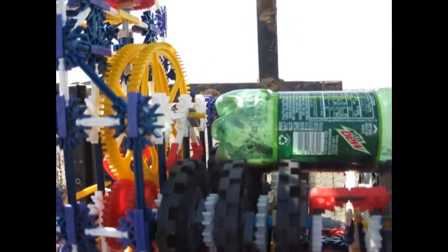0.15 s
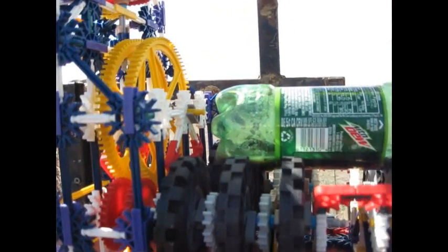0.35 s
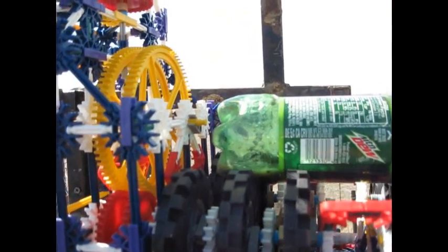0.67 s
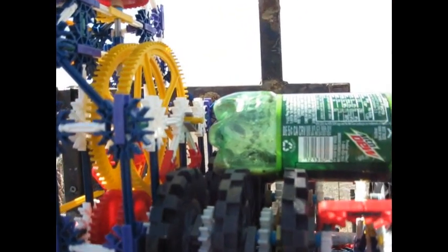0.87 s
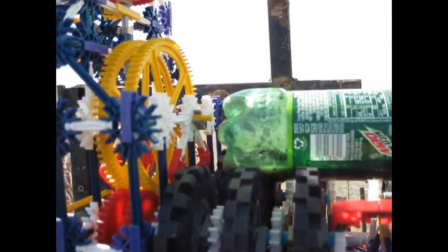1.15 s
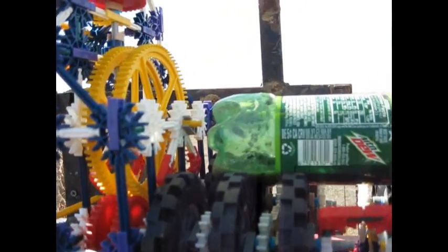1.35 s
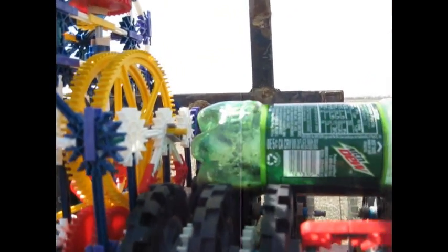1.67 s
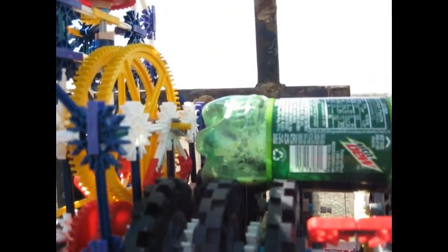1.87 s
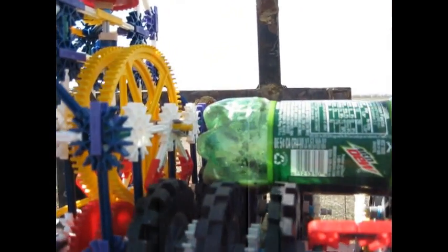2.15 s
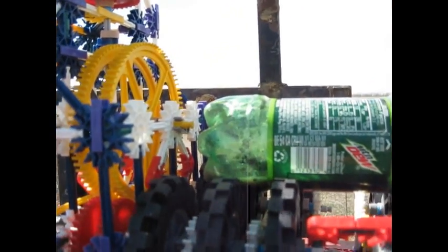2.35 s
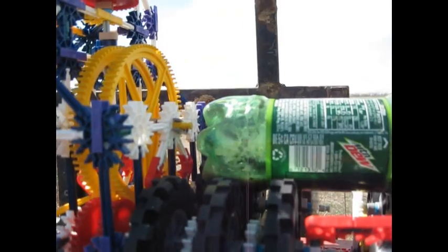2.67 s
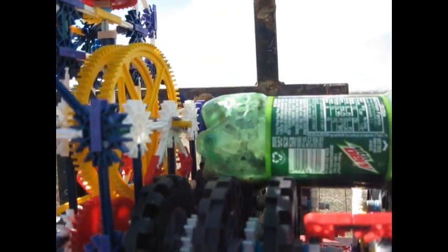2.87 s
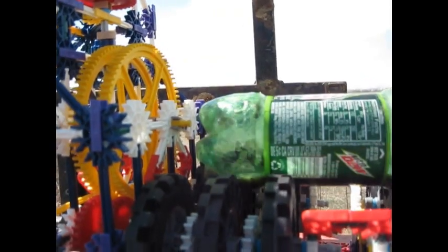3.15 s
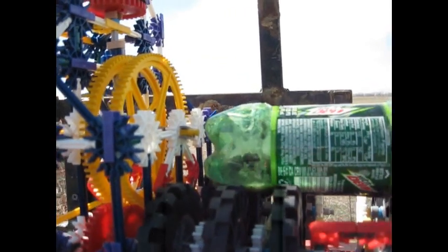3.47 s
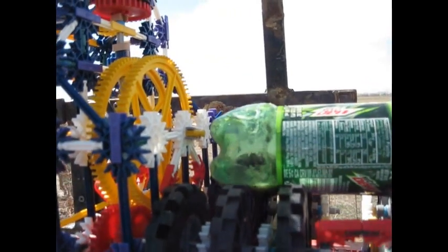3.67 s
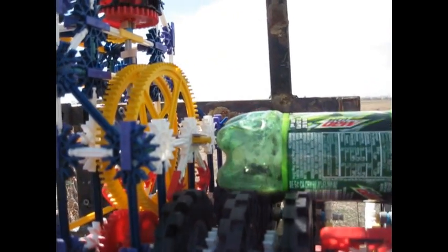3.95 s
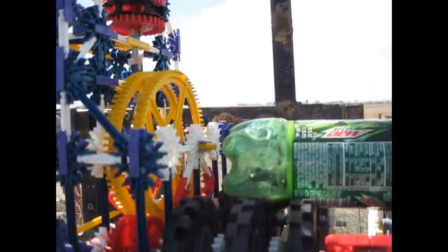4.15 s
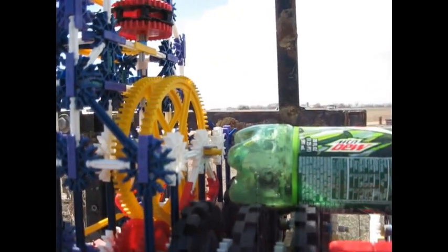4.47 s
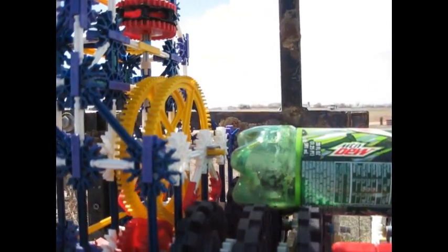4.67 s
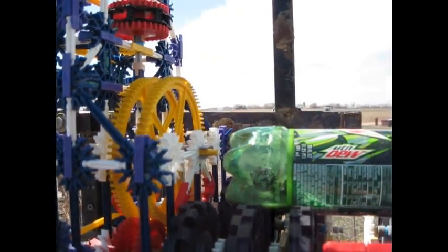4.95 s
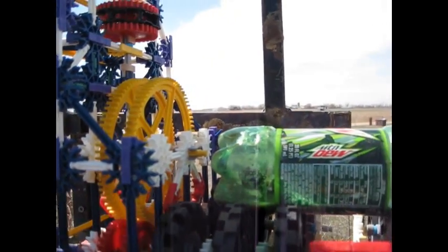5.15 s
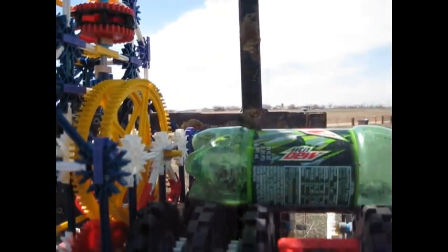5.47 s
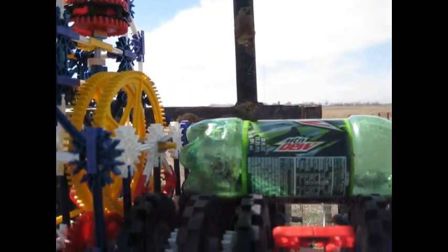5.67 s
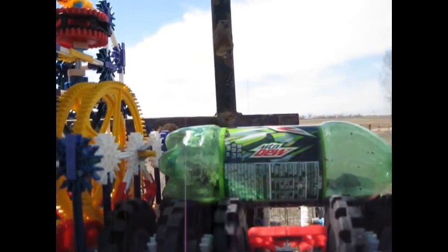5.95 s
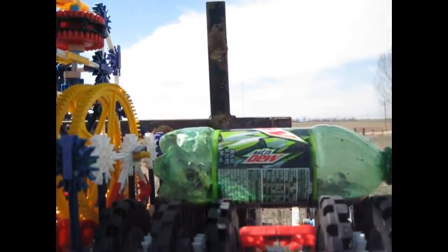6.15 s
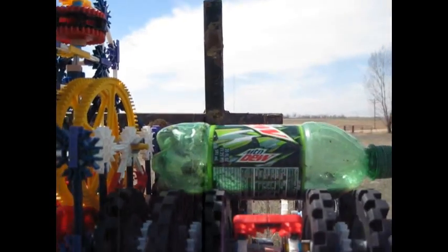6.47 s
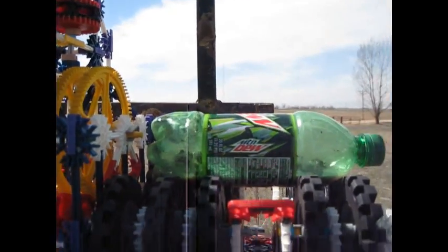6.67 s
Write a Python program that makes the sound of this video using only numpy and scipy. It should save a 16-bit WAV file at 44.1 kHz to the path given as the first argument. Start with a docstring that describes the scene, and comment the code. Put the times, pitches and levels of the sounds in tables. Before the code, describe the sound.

Throughout, a toy motor gives a low hum near 90 Hz, sagging slightly in pitch, with buzzing overtones, a frame rumble and fine plastic gear rustle. It is close, dry and outdoors, with a narrow small-camera sound. A soft wind bump comes at 0.1 s. At 0.6-0.8 s stones crack and thud against the hollow bottle with a spill of grit as the background dips briefly; a smaller knock follows at 1.1. From 1.2 to 2.1 the hum swells, with faint high axle chirps and scraping and small gusts. Knocks land at 2.2, then gravel builds to a loud, very short clack with a plink at 3.24. Rattling slides and clicks follow at 3.7-4.0, 4.64 and 5.1-5.2, with light scraping around 4.5. After a quieter stretch, gravel surges at 6.3-6.6 with rapid clicks, one bright tick at 6.47 and hollow plinks, ending around 6.8.

```python
"""A toy-motor rock tumbler close by in the open air: a plastic bottle turns on wheels, driven through plastic gears.
Stones drop against the bottle wall as noise cracks with a hollow modal thud, and gravel slides down it in swells
of tiny impacts and ringing pebbles. The motor hums as a slowing stack of sine orders, the gears rustle as coloured
noise, an axle chirps, hollow plinks ring inside the bottle and light wind buffets the microphone.
The microphone is that of a small camera with a narrow band; one very short bright tick is heard near the end."""
import sys
import numpy as np
from scipy import signal
from scipy.fft import rfft, irfft, next_fast_len
from scipy.io import wavfile
from scipy.ndimage import map_coordinates

SR = 44100
rng = np.random.default_rng(int(sys.argv[2]) if len(sys.argv) > 2 else 0)


def put_to_file(sound):
    """Save the sound as 16-bit audio at rate SR, in the file named by the first command-line argument."""
    columns = np.atleast_2d(sound).T  # one column per channel
    safe = np.clip(columns, -1, 1)
    whole_steps = np.round(safe * 32767)
    wavfile.write(sys.argv[1], SR, whole_steps.astype(np.int16))


N = 300497  # length in samples


def amp(db):
    """Decibels to gain."""
    return 10 ** (np.asarray(db) / 20)


def unit(x):
    """Scaled to rms 1."""
    return x / np.sqrt(np.mean(x ** 2) + 1e-20)


def curve(rows):
    """A (seconds, value) table drawn as straight lines, one value per sample."""
    seconds, values = np.transpose(rows)
    return np.interp(np.arange(N) / SR, seconds, values)


def wobble(rate):
    """A smooth random curve, rate knots a second."""
    knots = rng.standard_normal(int(N * rate / SR) + 4)
    return map_coordinates(knots, [np.arange(N) * rate / SR])


def filtered(x, response):
    """x times a complex response of frequency."""
    size = next_fast_len(len(x) + 8192)  # spare room keeps tails from wrapping round to the start
    hz = np.fft.rfftfreq(size, 1 / SR)
    return irfft(rfft(x, size) * response(hz), size)[:len(x)]


def colour(points, hz):
    """Causal, minimum-phase response through (Hz, dB) points, with a weak shelf in the high treble."""
    point_hz, point_db = np.transpose(points)
    level_db = np.interp(np.log(hz + 1), np.log(point_hz), point_db)
    shelf = 0.15 + 0.85 / (1 + (hz / 5900) ** 30)
    cepstrum = irfft(np.log(amp(level_db) * shelf))
    half = len(cepstrum) // 2
    # folding the cepstrum onto positive times makes the response causal
    fold = np.r_[1, np.full(half - 1, 2), 1, np.zeros(half - 1)]
    return np.exp(rfft(cepstrum * fold))


def resonance(hz, centre, width):
    """One causal band-pass mode."""
    return 1j * hz * width / (centre ** 2 - hz ** 2 + 1j * hz * width)


def noise(points):
    """Coloured noise of rms 1."""
    return unit(filtered(rng.standard_normal(N), lambda hz: colour(points, hz)))


def contacts(rate, spread_db):
    """Random tiny impacts of uneven size, about rate a second, rms 1."""
    hits = rng.random(N) < rate / SR
    signs = rng.choice([-1, 1], N)
    sizes = amp(spread_db * np.clip(rng.standard_normal(N), -2, 2))
    return unit(hits * signs * sizes)


def add(out, s, x):
    """Mix x into out at s seconds."""
    start = max(round(s * SR), 0)
    out[start:start + len(x)] += x[:max(N - start, 0)]


SWELL_DB = 20  # how far below full level a swell lies at its rise or fall time
SWELL_BEND = 1.355  # above 1, a swell is round on top and steep at its feet


def swell(s, rise, hold, fall, db):
    """A gain that grows to db at s seconds, holds and dies away; rise and fall are the times for SWELL_DB."""
    t = np.arange(N) / SR - s
    before = np.maximum(-t, 0) / max(rise, 1 / SR)
    after = np.maximum(t - hold, 0) / max(fall, 1 / SR)
    return amp(db - SWELL_DB * np.minimum(before + after, 10) ** SWELL_BEND)


# A brief dip in the low background. The row: start in seconds, rise in seconds, hold in seconds, fall in seconds,
# lost share of the gain in dB. A rise or fall below zero is a step of about one sample.
BACKGROUND_DIP = (.84, -0.67, 0.5, -0.26, -3.5)


def dip():
    """Gain of the low background, which drops for a moment."""
    return 1 - np.minimum(swell(*BACKGROUND_DIP), 1)


# Motor speed. Each row: time in seconds, rotor turns per second in Hz.
MOTOR_SPEED = [(0, 92.2), (.15, 94.6), (.9, 93.5), (1.4, 92.1), (2, 91.07), (2.7, 89.87), (3.3, 88.99),
               (3.9, 87.9), (4.4, 85.86), (4.9, 86), (5.4, 86.4), (6.1, 85.2), (6.5, 84.3), (6.81, 84.8)]
# The frame's shaking, once a rotor turn. Each row: time in seconds, level in dB before a slight flutter.
SHAKING = [(0.0, -39), (0.13, -38), (0.19, -46), (0.87, -51.5), (1.02, -40), (1.48, -30), (1.91, -31),
           (2.27, -38), (2.94, -37), (3.15, -41), (3.39, -34), (4.04, -37.5), (4.21, -43), (4.3, -37),
           (4.51, -41), (4.7, -34.5), (5.22, -36.5), (5.56, -33.5), (5.65, -40), (6.45, -37.5), (6.56, -43),
           (6.81, -35.5)]
# Overtones of the shaking. Each row: order in multiples of the rotor rate, level in dB at average shaking.
SHAKING_OVERTONES = [(2, -54.5), (3, -58), (4, -62.5), (5, -73)]
OVERTONE_FOLLOW = 0.27  # dB of overtone per dB of shaking
# A loose joint buzzes for a while on one order. Each row: start at full level in seconds, hold in seconds,
# order in multiples of the rotor rate, level in dB before flutter.
JOINT_BUZZES = [(0.132, 0.25, 4, -47), (.18, 0.085, 2, -51), (.18, 0.19, 3, -51.5), (1.273, .26, 2, -41.5),
                (1.38, 1.2, 3, -51), (1.925, 0.28, 4, -52.5), (2.18, .23, 2, -45.5), (2.5, 0.23, 4, -58),
                (2.636, 0.13, 2, -50.5), (3, 0.43, 2, -48.5), (3.115, 0.37, 3, -50.5),
                (3.78, 0.073, 2, -53.5), (4.717, .2, 3, -48.5), (4.725, 0.19, 4, -55),
                (5.159, 0.35, 3, -53), (6.068, .48, 3, -51), (6.45, 0.11, 2, -51.5)]
BUZZ_RISE_S, BUZZ_FALL_S = 0.14, 0.13
# Spectrum of the frame's rumble. Each row: frequency in Hz, relative density in dB per Hz.
FRAME_SPECTRUM = [(60, -18.5), (130, -4), (250, 1.5), (400, -8.5), (600, -8), (1000, -31)]
RUMBLE_DB, RUMBLE_FOLLOW = -52.5, 0.51  # level before the dip; dB of rumble per dB of the third order


def motor():
    """The unbalanced rotor shakes the frame once a turn; loose joints buzz on its overtones, and the frame rumbles."""
    phase = 2 * np.pi * np.cumsum(curve(MOTOR_SPEED)) / SR
    shake_db = curve(SHAKING)
    gains = {1: amp(shake_db)}
    for order, db in SHAKING_OVERTONES:
        follow_db = OVERTONE_FOLLOW * (shake_db - shake_db.mean())
        gains[round(order)] = dip() * amp(db + follow_db)
    for s, hold, order, db in JOINT_BUZZES:
        buzz = swell(s, BUZZ_RISE_S, hold, BUZZ_FALL_S, db)
        gains[round(order)] = gains[round(order)] + buzz
    hum = 0  # the orders start in step, so that each turn is one lopsided beat
    for order, gain in gains.items():
        # the first order keeps its phase; higher orders waver and flutter more
        waver = 0.073 * (order - 1) ** 2 * wobble(24)  # radians
        flutter_db = (0.54 + 0.7 * (order - 1)) * wobble(22)
        tone = np.sqrt(2) * np.sin(order * phase + waver)
        hum = hum + gain * amp(flutter_db) * tone
    rumble = unit(gains[3] ** RUMBLE_FOLLOW) * noise(FRAME_SPECTRUM)
    return hum + dip() * amp(RUMBLE_DB) * rumble


# Gear rustle. Each row: time in seconds, level in dB before it wavers and its two parts are mixed.
RUSTLE_LEVEL = [(0, -46), (.55, -47), (.88, -50.5), (1.05, -48.5), (1.25, -47), (1.6, -45.5), (2.3, -47),
                (3.5, -47), (4.3, -46), (5.4, -46.5), (6, -48), (6.81, -45)]
# Spectrum of the rustle. Each row: frequency in Hz, relative density in dB per Hz.
RUSTLE_SPECTRUM = [(100, 8.5), (250, 9), (450, 8.5), (750, 0.5), (1100, 2.5), (1700, 0), (2600, -1),
                   (2900, 0.5), (3700, -1), (5400, -1.5)]
# Spectrum of the axle's scrape. Each row: frequency in Hz, relative density in dB per Hz.
SCRAPE_SPECTRUM = [(2500, -40.5), (4100, -4), (4550, 1), (4900, 0), (5400, -5.5)]
# The axle binds and rubs harder. Each row: start at full level in seconds, rise in seconds, hold in seconds,
# fall in seconds, level in dB before the scrape wavers.
HARD_RUBS = [(1.45, 0.35, .05, 0.59, -51), (4.326, 0.31, 0.35, 0.44, -52.5)]
RUB_DB = -68  # the dry axle's steady rubbing


def gears():
    """Plastic teeth and tyres rustle finely; a dry axle adds a high scrape that breaks into faint twitter."""
    teeth = unit(filtered(contacts(rate=1500, spread_db=1.5), lambda hz: colour(RUSTLE_SPECTRUM, hz)))
    rustle_gain = amp(curve(RUSTLE_LEVEL) + 0.43 * wobble(13))
    rustle = rustle_gain * (amp(-6.5) * noise(RUSTLE_SPECTRUM) + amp(-3) * teeth)
    squeak_hz = 4850 + 220 * wobble(50)
    squeak = np.sin(2 * np.pi * np.cumsum(squeak_hz) / SR)
    twitter = unit(amp(7 * np.clip(wobble(45), -2, 1.3)) * squeak)
    scrape = amp(1.7 * wobble(36)) * noise(SCRAPE_SPECTRUM)
    rubbing = amp(RUB_DB) + sum(swell(*row) for row in HARD_RUBS)
    return rustle + rubbing * (scrape + amp(-7.5) * twitter)


# Gusts on the microphone. Each row: start at full level in seconds, hold in seconds, level in dB before the lumps.
WIND_GUSTS = [(0.138, 0.11, -40), (1.31, 0.028, -46), (1.443, 0.02, -43.5), (1.796, 0.17, -52.5),
              (4.34, .07, -46)]
GUST_RISE_S, GUST_FALL_S = 0.029, 0.059
# Spectrum of the buffeting. Each row: frequency in Hz, relative density in dB per Hz.
BUFFET_SPECTRUM = [(10, -1.5), (30, -5.5), (55, -0.5), (90, -1.5), (130, -3), (220, -14), (500, -28),
                   (1500, -68)]
WIND_DB = -49  # the breeze between gusts, before the lumps


def wind():
    """Lumpy low buffeting at the microphone: a light breeze with a few short gusts."""
    gusts = sum(swell(s, GUST_RISE_S, hold, GUST_FALL_S, db) for s, hold, db in WIND_GUSTS)
    lumps_db = 1.5 * wobble(15)
    return dip() * (amp(WIND_DB) + gusts) * amp(lumps_db) * noise(BUFFET_SPECTRUM)


# Stones striking. Each row: time in seconds, level in dB before the parts are mixed, wall thud in dB beside
# the clatter before the mix, time for the clatter to decay 60 dB in seconds, emphasised pitch in Hz.
STONE_KNOCKS = [(0.125, -36.5, -4, 0.064, 3400), (0.6174, -18.5, -2.5, 0.05, 2000),
                (0.621, -18, -0.5, 0.046, 1050), (0.6534, -10.5, -12, 0.014, 3800),
                (0.654, -28, 8.5, 0.097, 3500), (0.712, -31.5, 2, 0.022, 3500),
                (0.7987, -12, -17.5, 0.015, 4680), (0.952, -34, -6, 0.034, 4500),
                (1.1127, -22, 1, 0.021, 3090), (1.118, -33, 8.5, 0.063, 1100),
                (1.625, -28.5, -10.5, .02, 3800), (2.179, -16.5, -6, 0.028, 2200),
                (2.183, -20, -13, 0.061, 3020), (2.668, -30.5, 3, 0.064, 3000),
                (2.734, -30.5, 0.5, 0.055, 3012), (3.086, -24.5, -6, 0.073, 4230),
                (3.239, -6.5, -12.5, 0.0048, 1507), (3.248, -24.5, -18, 0.053, 2538),
                (3.368, -27.5, 3, 0.029, 2800), (3.612, -28.5, -23, 0.017, 3500),
                (3.751, -19.5, -13, 0.026, 3500), (3.853, -20.5, -15, 0.024, 3000),
                (3.941, -11, -12.5, 0.025, 3100), (3.998, -32, 8, 0.03, 2500),
                (4.036, -33, -6, 0.024, 2500), (4.494, -30.5, -13, 0.057, 4000),
                (4.64, -14.5, -11, 0.016, 3000), (5.101, -22, -3.5, 0.18, 1500),
                (5.137, -14, -6, 0.048, 2540), (5.829, -29.5, -6, 0.019, 1200),
                (5.863, -29, 7.5, 0.11, 1050), (6.204, -41, -15, 0.028, 3500),
                (6.3669, -12.5, -13.5, 0.015, 3240), (6.385, -17.5, -15, 0.053, 1195),
                (6.4722, -14, -15, 0.0097, 4600), (6.535, -15, -22, 0.035, 2848),
                (6.565, -28.5, -16, 0.0333, 3530), (6.596, -22.5, -7, 0.042, 1000),
                (6.643, -35, 3, 0.03, 3220), (6.706, -32, -17, .02, 4200)]
# Modes of the bottle wall. Each row: frequency in Hz, width in Hz, relative level in dB.
WALL_MODES = [(234, 32, -0.5), (379, 32, 3.5), (528, 140, 0), (710, 160, -2), (1066, 100, 1.5),
              (1620, 250, -10)]
# Spectrum of a stone. Each row: frequency in Hz, relative density in dB per Hz before the emphasised pitch.
STONE_SPECTRUM = [(150, -19), (400, -1.5), (900, -4.5), (2000, 0), (3500, 1.5), (5400, 2)]


def wall_response(hz):
    """The bottle wall's modes, with alternating signs."""
    return sum((-1) ** k * amp(db) * resonance(hz, centre, width)
               for k, (centre, width, db) in enumerate(WALL_MODES))


def knocks():
    """Each stone cracks and chatters on its neighbours at its own pitch, and the wall answers with a hollow thud."""
    out, t = np.zeros(N), np.arange(SR // 4) / SR
    for s, db, thud_db, t60, pitch in STONE_KNOCKS:
        stone_noise, wall_noise = rng.standard_normal((2, len(t)))
        stone = lambda hz: colour(STONE_SPECTRUM, hz) * (1 + 2.4 * resonance(hz, pitch, 0.4 * pitch))
        clatter_rise = 1 - np.exp(-t / (0.039 * t60))  # a long clatter also builds up more slowly
        clatter = unit(filtered(stone_noise, stone)) * amp(-60 * t / t60) * clatter_rise
        thud_rise = 1 - np.exp(-t / 0.0042)
        thud = unit(filtered(wall_noise, wall_response)) * amp(thud_db - 60 * t / 0.13) * thud_rise
        add(out, s - 0.0006, amp(db) * (amp(-3.0) * clatter + amp(-6.5) * thud))
    return out


# Hollow plinks inside the bottle. Each row: start in seconds, starting pitch in Hz,
# time to decay 60 dB in seconds, level in dB before the onset softens it.
BOTTLE_PLINKS = [(.633, 922, 0.05, -25.5), (3.2404, 1270, 0.0096, -8), (5.831, 1340, .012, -28),
                 (6.473, 893, 0.029, -23), (6.484, 1350, 0.031, -18), (6.566, 752, 0.026, -19.5),
                 (6.774, 1280, 0.0072, -14.5), (6.8, 1497, .015, -26.5)]
# The bottle singing hollow. Each row: start at full level in seconds, rise in seconds, hold in seconds,
# fall in seconds, level in dB.
HOLLOW_RINGS = [(6.489, 0.024, .005, 0.11, -39.5), (6.698, .06, .01, .06, -49), (6.804, .05, .02, .1, -40)]


def bottle():
    """Short sine plinks of rising pitch inside the bottle, and noise through its resonance that lingers hollow."""
    out, t = np.zeros(N), np.arange(SR // 10) / SR
    for s, pitch, t60, db in BOTTLE_PLINKS:
        plink_hz = pitch * (1 + 0.4 * np.minimum(t / t60, 1))
        phase = 2 * np.pi * np.cumsum(plink_hz) / SR
        onset = 1 - np.exp(-t / 0.00086)
        add(out, s, amp(db - 60 * t / t60) * onset * np.sin(phase))
    ring = unit(filtered(rng.standard_normal(N), lambda hz: resonance(hz, 1460, 380) ** 2))
    return out + sum(swell(*row) for row in HOLLOW_RINGS) * ring


# Gravel sliding down the wall. Each row: start of full flow in seconds, rise in seconds, hold in seconds,
# fall in seconds, level in dB before the flow wavers and its two parts are mixed.
GRAVEL_SLIDES = [(0.656, .01, 0.0083, .15, -33.5), (0.769, 0.031, .025, 0.016, -45),
                 (1.121, 0.0073, 0.0041, 0.033, -32.5), (2.51, 0.066, 0.068, .03, -49),
                 (2.637, 0.032, 0.057, 0.072, -40.5), (3.094, 0.068, 0.013, 0.076, -33.5),
                 (3.246, 0.14, 0.11, 0.091, -31), (3.779, 0.22, 0.096, 0.19, -32),
                 (3.992, 0.034, 0.017, 0.04, -35), (4.662, 0.32, 0.044, 0.12, -32.5),
                 (5.209, .05, 0.0091, 0.13, -39), (5.37, 0.054, 0.046, 0.39, -48.5),
                 (6.35, 0.14, .12, 0.054, -29.5), (6.537, 0.031, 0.041, 0.11, -34.5)]
# Spectrum of the gravel. Each row: frequency in Hz, relative density in dB per Hz.
GRAVEL_SPECTRUM = [(150, -25), (420, -10.5), (600, 1), (740, 1.5), (860, -1), (1060, 4.5), (1250, -5),
                   (1700, -1.5), (2100, -4), (2700, -3), (2900, -1), (3300, -1.5), (3700, -2.5),
                   (5400, -1.5)]
# Pebble pitches from large to small. Each entry: frequency in Hz.
PEBBLE_PITCHES = [716, 1070, 1370, 1840, 2260, 3020, 3540, 4150, 4800]


def slides():
    """Gravel carried up the wall lets go: a shower of grit, and coarser pebbles that ring at the pitch of their size."""
    flow = sum(swell(*row) for row in GRAVEL_SLIDES)
    gravel = lambda hz: colour(GRAVEL_SPECTRUM, hz)
    grit = unit(filtered(contacts(rate=5000, spread_db=4.5), gravel))
    rings = np.zeros(N)
    for pitch in PEBBLE_PITCHES:
        b, a = signal.iirpeak(pitch, pitch / 420, SR)  # each ring is 420 Hz wide
        rings += signal.lfilter(b, a, contacts(rate=100, spread_db=4))
    pebbles = unit(filtered(rings, gravel))
    mix = amp(-3.5) * grit + amp(-2.6) * pebbles
    return flow * amp(1.5 * wobble(110)) * mix


# Dry axles chirping. Each row: middle in seconds, length in seconds, lowest pitch in Hz, peak level in dB.
AXLE_CHIRPS = [(1.25, .022, 4380, -41.5), (1.369, 0.033, 5200, -46.5), (1.458, 0.032, 4500, -32),
               (1.565, .012, 5270, -43), (1.686, .035, 5150, -40), (1.77, .027, 3480, -49),
               (1.798, 0.016, 5320, -46.5), (1.909, 0.031, 5365, -46), (2.001, .016, 3730, -47),
               (2.074, 0.044, 5120, -45), (6.113, .025, 3880, -45), (6.667, 0.025, 4467, -41.5)]


def chirps():
    """An axle sticks and sings for an instant, its pitch dipping in the middle."""
    out = np.zeros(N)
    for s, length, pitch, db in AXLE_CHIRPS:
        u = np.linspace(-1, 1, int(length * SR))  # -1 at the start, 1 at the end
        phase = 2 * np.pi * np.cumsum(pitch * (1 + 0.057 * u ** 2)) / SR
        envelope = np.cos(u * np.pi / 2) ** 2
        add(out, s - length / 2, amp(db) * envelope * np.sin(phase))
    return out


def scene():
    """Everything is close to the microphone and in the open air, with no echo."""
    return (motor() + gears() + wind() + knocks() + bottle() + slides() + chirps())[None]


BAND_HZ, TOP_HZ = 5360, 15800  # edge of the camera's narrow band; upper limit of everything


def bright_tick(s, db):
    """One very short tick: a single-sample impulse of level db, keeping only what lies above the narrow band."""
    out = np.zeros(N)
    out[round(s * SR)] = amp(db)
    return filtered(out, lambda hz: hz > BAND_HZ)


def record(dry):
    """The camera passes a narrow band with a steep edge and a faint leak above it; one bright tick is added."""
    narrow = filtered(dry[0], lambda hz: 1 / np.sqrt(1 + (hz / BAND_HZ) ** 220) + 0.016)
    tick = bright_tick(s=6.4722, db=-10)
    return filtered(narrow + tick, lambda hz: hz < TOP_HZ)[None]


dry = scene()
out = record(dry)
put_to_file(out)
```